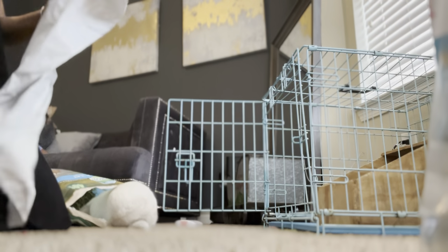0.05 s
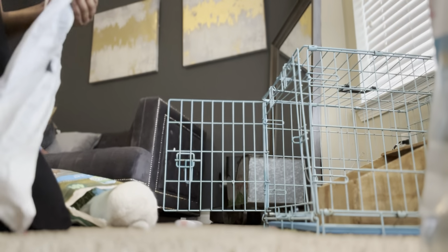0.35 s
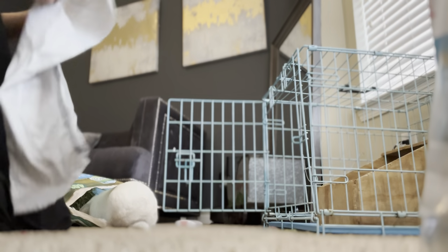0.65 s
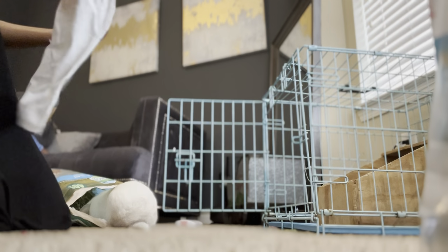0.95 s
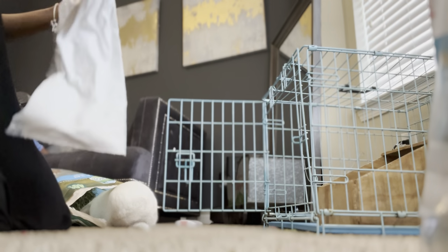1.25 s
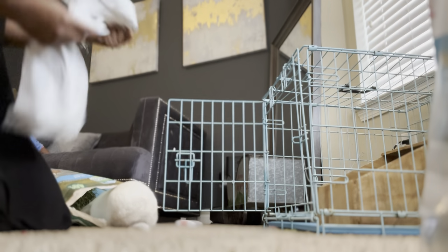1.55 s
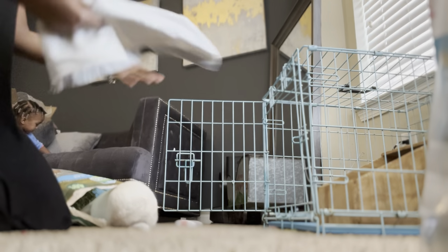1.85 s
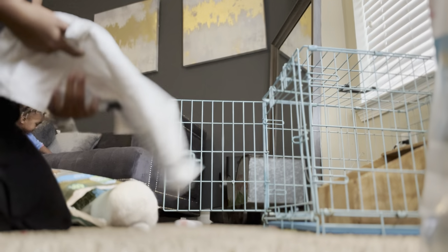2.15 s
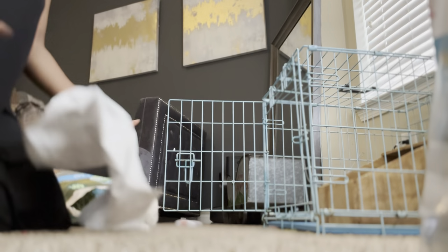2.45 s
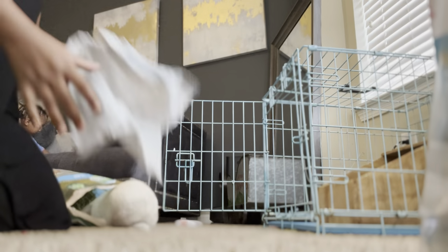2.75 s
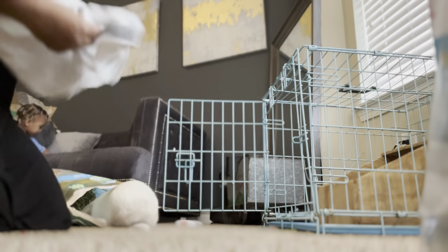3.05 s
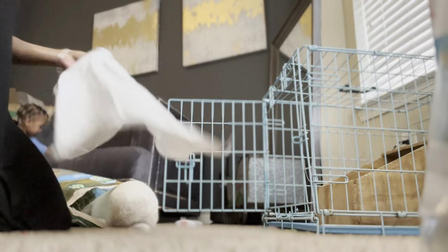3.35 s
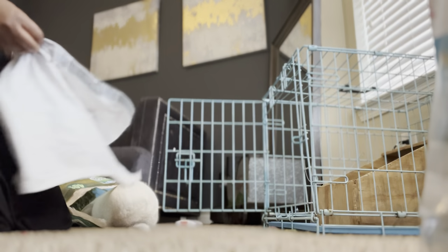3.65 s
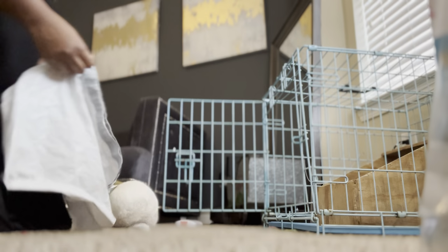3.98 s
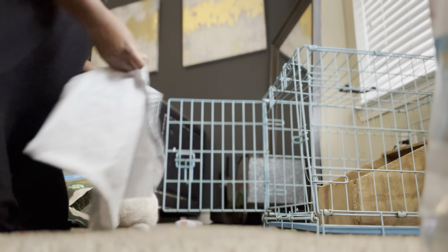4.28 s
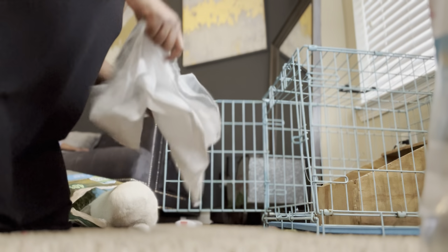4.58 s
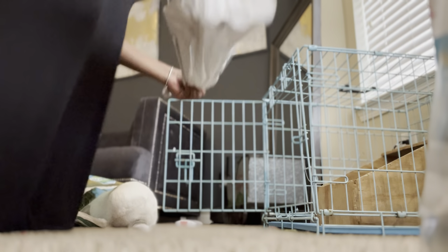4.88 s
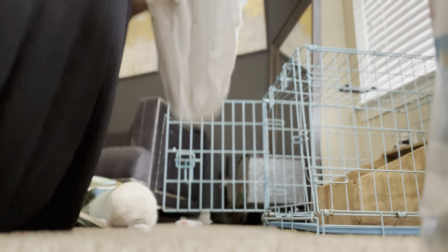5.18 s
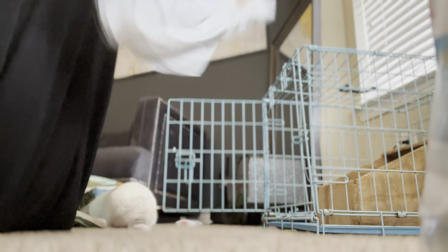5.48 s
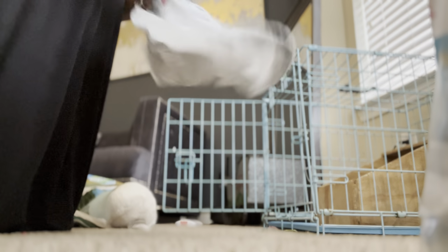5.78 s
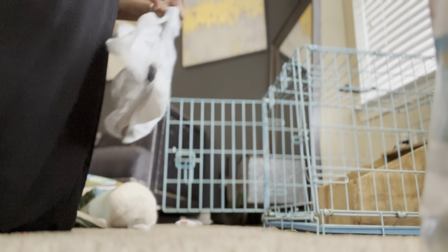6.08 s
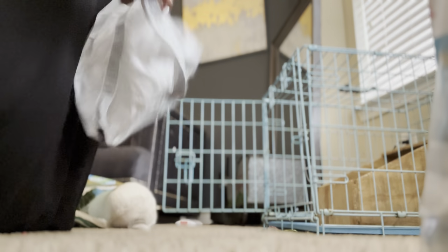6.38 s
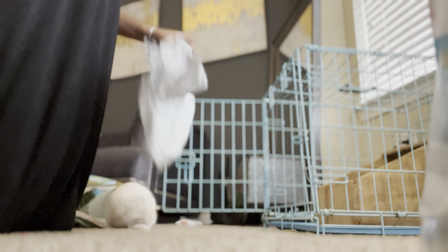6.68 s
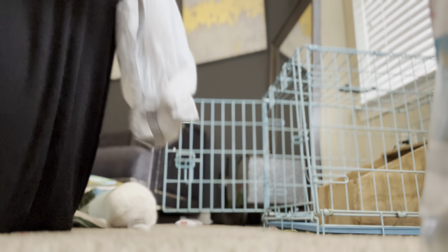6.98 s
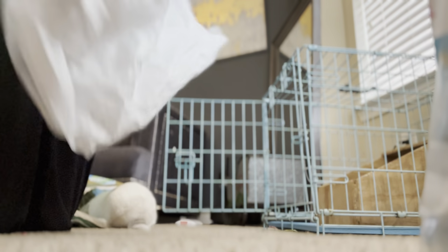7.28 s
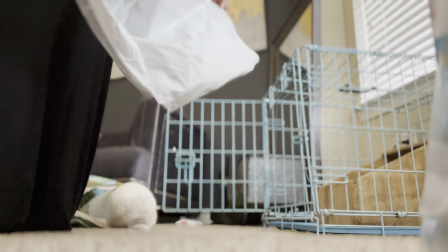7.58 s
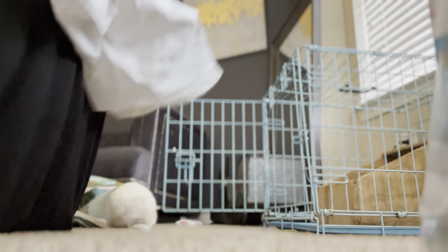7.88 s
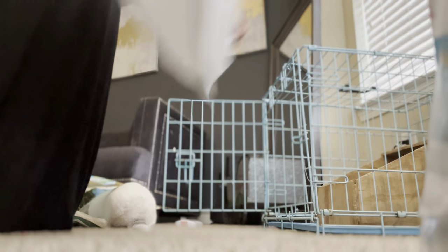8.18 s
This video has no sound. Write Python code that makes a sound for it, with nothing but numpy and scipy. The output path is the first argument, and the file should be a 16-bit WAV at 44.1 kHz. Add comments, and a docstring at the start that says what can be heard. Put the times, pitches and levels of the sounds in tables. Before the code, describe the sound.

In a carpeted living room, heard from the floor, a faint, steady appliance hum runs beneath the close rustling of a thin plastic bag just left of center. Hands scuff the plastic and shake it open with irregular swishes and low puffs of air. One deep, padded thud on the floor stands out after about three and a half seconds, then the bag keeps swishing, its creases snapping more crisply toward the end.

```python
"""An appliance hums and whirrs steadily in a carpeted living room, behind a swishing thin plastic bag.
The bag is swung and shaken a little left of a camera on the floor, heard at its two microphone ports.
Moving film swishes, tiny buckles crinkle, stiff creases snap, and the bag flaps as it fills with air.
Once, after a soft tap, the person's weight lands on the floor with a dull thump.
The hum is a motor's tone beating with the mains; the whirr is its bearing rubbing once a turn."""
import sys
import numpy as np
from scipy import signal
from scipy.fft import rfft, irfft, next_fast_len
from scipy.io import wavfile
from scipy.ndimage import uniform_filter1d, map_coordinates

SR = 44100
rng = np.random.default_rng(int(sys.argv[2]) if len(sys.argv) > 2 else 0)


def wav_record(signal):
    """Record a signal, one row per channel, as 16-bit PCM in the file named by sys.argv[1]."""
    frames = np.transpose(np.atleast_2d(signal))
    bounded = np.clip(frames, -1, 1)
    # unit amplitude maps onto the largest positive 16-bit level
    quanta = np.round(bounded * 32767).astype(np.int16)
    wavfile.write(sys.argv[1], SR, quanta)


N = 371895


def amp(db):
    """Decibels to gain."""
    return 10 ** (np.asarray(db) / 20)


def unit(x):
    """Scale to rms 1."""
    return x / np.sqrt(np.mean(x ** 2) + 1e-20)


def along(points, hz):
    """Read (frequency, value) points on a log frequency axis."""
    freqs, values = np.transpose(points)
    return np.interp(np.log(hz + 1), np.log(freqs + 1), values)


def curve(points):
    """Read (time, value) points at every sample."""
    return np.interp(np.arange(N) / SR, *np.transpose(points))


def wobble(rate):
    """A wandering random curve, rate knots a second."""
    knots = rng.standard_normal(int(N * rate / SR) + 4)
    return map_coordinates(knots, [np.arange(N) * rate / SR], order=1)


def filtered(x, response):
    """Pass x through a complex response of frequency."""
    size = next_fast_len(N + SR // 2)
    return irfft(rfft(x, size) * response(np.fft.rfftfreq(size, 1 / SR)), size)[..., :N]


def equalised(x, spectrum):
    """Shape x by (freq_hz, gain_db) points."""
    return filtered(x, lambda hz: amp(along(spectrum, hz)))


def coloured(x, spectrum):
    """Shape x by a spectrum, at rms 1."""
    return unit(equalised(x, spectrum))


def add(track, s, sound):
    """Mix a sound into a track at time s."""
    part = track[max(round(s * SR), 0):][:len(sound)]
    part += sound[:len(part)]


def pulse(t, hz, cycles):
    """A sine that swells for the given number of cycles, then dies away."""
    age = t * hz / cycles
    return age * np.exp(1 - age) * np.sin(2 * np.pi * hz * t)


def pushes(rows, cycles):
    """One short, soft pressure swing for each row."""
    track, t = np.zeros(N), np.arange(SR // 10) / SR
    for s, db, hz in rows:
        add(track, s, amp(db) * pulse(t, hz, cycles))
    return track


def appliance():
    """Behind the bag, mains hum and a motor's tone beat slowly, over a shaft tone and rushing air."""
    # the motor's drifting tone: time_s, above_mains_hz
    motor_offset = [(0, 1.95), (1.6, 1.57), (2.8, 3.23), (4, 2.3), (4.4, 3.58), (4.8, 1.37), (5.6, 2.87),
                    (6, 2.44), (7.2, 2.33), (8, 1.29), (8.4, 3.28)]
    # its strength: time_s, level_db
    motor_level = [(0, -57), (2.8, -61), (4.6, -49), (8.43, -54)]
    # colour of the moving air: freq_hz, gain_db
    air_colour = [(15, -44), (30, -44), (50, 0), (70, 0), (105, -3.5), (135, -3.5), (170, -13.5),
                  (260, -19), (400, -22.5), (600, -35), (800, -32), (1000, -35.5), (1300, -31.5),
                  (2000, -38.5), (2800, -41.5), (3900, -39), (4700, -37), (5600, -46), (7500, -47),
                  (12000, -67)]
    # how alike the air sounds at the two ports: freq_hz, correlation
    air_likeness = [(60, 0.7), (130, -0.11), (250, -0.75), (480, -0.76), (800, -0.43), (1400, 0.028),
                    (4000, -0.072), (12000, 0.59)]
    mains_hz, shaft_hz = 120.03, 41
    t = np.arange(N) / SR
    mains_phase = 2 * np.pi * mains_hz * t
    motor_phase = mains_phase + 2 * np.pi * np.cumsum(curve(motor_offset)) / SR
    motor = amp(curve(motor_level) + 1.3 * wobble(3.4)) * np.sin(motor_phase)
    hum = amp(-45.5) * np.sin(mains_phase) + motor
    shaft = amp(-57 + 1.6 * wobble(1.9)) * np.sin(2 * np.pi * shaft_hz * t)
    width = lambda hz: np.arccos(np.clip(along(air_likeness, hz), -1, 1)) / 2
    noise = rng.standard_normal((2, N))
    mid, side = filtered(noise, lambda hz: np.array([np.cos(width(hz)), np.sin(width(hz))]))
    air = amp(-49) * coloured(np.array([mid + side, mid - side]), air_colour)
    return np.sqrt(2) * (hum * amp([[.2], [-.2]]) + shaft) + air


def bearing_whirr():
    """The motor's bearing chugs softly: a band of friction noise that swells once a turn."""
    # colour of the friction: freq_hz, gain_db
    rub_colour = [(200, -70), (500, -30), (800, -7), (980, -10), (1200, 0), (1500, -2), (1900, -5.5),
                  (2300, -17), (4000, -40), (8000, -90)]
    turn_hz, first_rub_s, swing_db = 30, .015, 16.5
    angle = 2 * np.pi * turn_hz * (np.arange(N) / SR - first_rub_s)
    rub = amp(swing_db / 2 * np.cos(angle))
    friction = rng.standard_normal((2, N)) + .59 * rng.standard_normal(N)  # partly common to both ports
    return amp(-69.5) * unit(rub * coloured(friction, rub_colour))


def stroke_gains():
    """Each swing gathers speed, holds and dies away; gains of the swish, crinkle and billow."""
    # swings of the bag, rising and falling by 20 dB in rise_s and fall_s:
    # full_speed_s, hold_s, rise_s, fall_s, swish_db, crinkle_offset_db, billow_offset_db
    strokes = [(.092, 0.013, 0.1, 0.05, -68, 3, -2), (.2, 0.056, 0, 0, -74, 1.5, 0),
               (0.57, 0.05, 0.1, 0.3, -62.5, -2.5, -4.5), (0.857, 0.053, 0.23, 0.08, -47, -2.5, -3.5),
               (0.983, 0.15, 0.16, 0.25, -64, 2, -1), (1.18, .035, .05, 0.3, -62, -5, -2),
               (1.396, 0.24, 0.06, 0.21, -54.5, -3, -2), (2.291, 0.068, 0.16, 0.17, -49.5, -6, -1),
               (2.658, 0.05, 0.3, 0.25, -66, 1, -3), (2.9, 0.01, 0.11, 0.27, -55, -1, -4.5),
               (3.136, 0.019, 0.19, 0.0551, -46, -5.5, -6), (3.471, 0.023, 0.04, 0.09, -57, 0.5, 2.5),
               (3.566, 0.053, 0.18, 0.07, -63, 6.5, 0), (3.767, 0.07, 0.35, 0.15, -72, 6, -9),
               (3.98, .04, 0.2, 0.9, -68, 4, -6), (4.288, 0.25, 0.36, 0.76, -53.5, -2, -6),
               (4.729, 0.039, 0.23, 0.0742, -41.5, -1, -3.5), (4.803, 0.027, 0.3, 0.72, -60.5, 4, -1.5),
               (5.385, 0.059, 0.13, 0.04, -49, 7.5, 1.5), (5.77, 0.11, 0.36, 0.13, -56, -1.5, -1),
               (6.234, 0.041, 0.1, 0.33, -55.5, 1.5, -1.5), (6.397, 0.046, 0.12, 0.05, -46, 3.5, -5.5),
               (6.474, 0.023, 0.0954, 0.05, -48.5, 3.5, -0.5), (6.813, 0.013, 0.09, 0.21, -54, 1.5, -2),
               (7.03, 0.083, 0.14, 0.06, -50.5, 0, -1), (7.216, 0.12, 0.19, 0.16, -54.5, 1, -2),
               (7.663, 0.079, 0.32, 0.17, -60, 4, 0.5), (7.953, 0.035, 0.12, 0.14, -50.5, 2.5, 0),
               (8.116, 0.024, 0.2, 0.17, -61.5, 1.5, 3), (8.421, 0.02, 0.04, 0.1, -53, 4, -8)]
    resting_db = np.array([[-73.5], [-78.5], [-73]])  # between strokes the hanging film still stirs
    t = np.arange(N) / SR
    power = amp(resting_db + wobble(7.1)) ** 2
    for s, hold, rise, fall, db, *offsets_db in strokes:
        shape_db = -20 * (np.maximum(s - t, 0) / rise + np.maximum(t - s - hold, 0) / fall)
        near = shape_db > -50
        power[:, near] += amp(db + np.array([0, *offsets_db])[:, None] + shape_db[near]) ** 2
    return np.sqrt(power)


def buckles(per_second, pitch_hz, pitch_spread, size_spread_db, cycles):
    """Countless tiny buckles click on three paths: direct, and scattered to the left and right port."""
    chance, pitch, size = rng.random(N), rng.standard_normal(N), rng.standard_normal(N)
    at = np.flatnonzero(chance < per_second / SR)
    hz = np.clip(pitch_hz * np.exp(pitch_spread * pitch[at]), 600, 15000)
    gain = amp(size_spread_db * np.minimum(size[at], 2.8)) * np.sqrt(hz / per_second[at])
    offsets = np.arange(SR // 600)
    grains = gain[:, None] * pulse(offsets / SR, hz[:, None], cycles)
    detours = rng.integers(0, SR // 1000, (2, N))[:, at]  # scattered clicks come up to 1 ms late
    signs = rng.choice([-1, 1], (2, N))[:, at]
    paths = []
    for arrival, sign in [(at, np.ones(len(at))), *zip(at + detours, signs)]:
        samples = arrival[:, None] + offsets
        paths.append(np.bincount(samples.ravel(), (sign[:, None] * grains).ravel(), N)[:N])
    return unit(np.array(paths))


def shifting_folds(x, depth_db=1.7, width_hz=520, life_s=.06, size=256):
    """Shifting folds lend the film passing resonances, the same on every path."""
    spectra = signal.stft(x, nperseg=size)[2]
    field = rng.standard_normal(spectra.shape[1:])
    field = uniform_filter1d(field, round(width_hz * size / SR), axis=0)
    field = uniform_filter1d(field, round(2 * life_s * SR / size), axis=1)
    return unit(signal.istft(spectra * amp(depth_db * unit(field)), nperseg=size)[1][:, :N])


def bag_film():
    """Faster motion buckles more creases a second, while the film swishes and billows in flutters."""
    # colour of the bright crinkle: freq_hz, gain_db
    crinkle_colour = [(500, -20), (1250, -7.5), (1900, -9.5), (2700, -6.5), (3400, -6), (4300, 0),
                      (5600, -3), (7000, -7.5), (9000, -10), (10500, -16.5), (12000, -18), (15500, -17)]
    # colour of the midrange swish: freq_hz, gain_db
    swish_colour = [(300, -8), (620, -11), (820, 0.5), (1000, -8), (1250, 1.5), (1600, -9), (2200, -14.5),
                    (4000, -17.5), (9000, -29.5)]
    # colour of the low billow: freq_hz, gain_db
    billow_colour = [(120, 7), (210, 3.5), (300, -1.5), (430, 2.5), (550, -2), (720, -12.5), (1200, -32.5)]
    swish_gain, crinkle_gain, billow_gain = stroke_gains()
    per_second = np.clip(3500 * (crinkle_gain / amp(-50)) ** .7, 500, 14000)
    flutter = wobble(70) + .23 * wobble(24)
    hiss = lambda: rng.standard_normal((3, N))
    grains = buckles(per_second, pitch_hz=5200, pitch_spread=.6, size_spread_db=5.6, cycles=.5)
    fine_hiss = amp(1.5) * hiss()  # buckles too fine to tell apart
    crinkle = coloured(shifting_folds(grains + fine_hiss), crinkle_colour)
    swish = coloured(shifting_folds(hiss()), swish_colour)
    billow = coloured(hiss(), billow_colour)
    return (crinkle * crinkle_gain * amp(1.14 * flutter + .82)
            + swish * swish_gain * amp(2.1 * flutter + .67 * wobble(40) - 1.9)
            + billow * billow_gain * amp(2.45 * flutter + 4))


def hand_brushes():
    """A hand meets the film: a sudden papery scuff that dies away."""
    # touches of the hands: start_s, relative_level_db, t60_s
    touches = [(0.087, -53, .08), (0.511, -59, .06), (0.832, -39, .1), (1.686, -49, .06), (2.014, -53, .08),
               (2.223, -51, .1), (2.821, -49.5, .1), (2.904, -44, .09), (3.467, -48, .1), (4.159, -50, .04),
               (5.208, -50, .03), (6.812, -50, .1), (8.123, -53, .05), (8.412, -47, .15)]
    # colour of the scuff: freq_hz, gain_db
    scuff_colour = [(150, -12), (400, -1), (750, -2), (1300, 2), (2100, -11), (4500, -17), (12000, -31)]
    level, t = np.zeros(N), np.arange(SR // 5) / SR
    attack = 1 - np.exp(-t / .002)
    for s, db, t60 in touches:
        add(level, s, amp(db - 60 * t / t60) * attack)
    return amp(2) * level * coloured(rng.standard_normal((3, N)), scuff_colour)


def flaps():
    """The bag fills with air and flaps, each time one low push of pressure."""
    # fillings of the bag: start_s, level_db, pitch_hz
    fillings = [(.097, -46, 283), (.571, -39, 238), (1.208, -40, 260), (1.446, -35.5, 257),
                (1.68, -43, 281), (2.303, -27, 262), (2.316, -27.5, 72), (2.341, -28, 200),
                (2.376, -26, 72), (3.139, -29, 300), (3.143, -27.5, 95), (3.18, -41, 280),
                (3.486, -26.5, 250), (4.721, -30, 204), (4.776, -27, 134), (5.161, -49, 280),
                (6.69, -42, 276), (7.102, -34.5, 380), (7.204, -32.5, 380)]
    return pushes(fillings, cycles=.29)


def snaps():
    """A stiff crease tears through and rings briefly; the film crackles on and the wall answers."""
    # creases that snap through: start_s, relative_level_db, pitch_hz
    creases = [(0.3638, -48, 2860), (0.3645, -46, 4770), (0.375, -51, 5200), (0.6789, -51, 4680),
               (0.9872, -39, 4600), (1.4047, -55, 4750), (1.467, -37, 4200), (1.4738, -42, 3600),
               (1.4824, -48, 3580), (1.6432, -38, 4000), (1.6875, -40, 4020), (2.4133, -45.5, 3420),
               (2.655, -42, 4940), (2.7274, -49, 6550), (2.8217, -43.5, 4750), (2.9053, -37.5, 3540),
               (3.4686, -40, 4800), (3.571, -42, 5500), (3.6, -39, 3500), (3.635, -38.5, 4640),
               (3.6586, -43.5, 5980), (3.81, -47, 4830), (3.8357, -48, 4890), (3.942, -44.5, 4890),
               (3.9896, -41.5, 5000), (4.0642, -44, 4560), (4.0806, -41.5, 5720), (4.097, -48, 4780),
               (4.16, -36.5, 4850), (4.473, -47, 6330), (4.853, -44, 4910), (4.9897, -43.5, 4330),
               (5.209, -44.5, 2580), (5.4454, -27, 5100), (5.88, -46, 3630), (6.4162, -24, 4170),
               (6.4902, -31.5, 4090), (6.5814, -46.5, 3730), (6.9317, -29, 4300), (7.1133, -29.5, 4230),
               (7.1365, -37, 3980), (7.3163, -39.5, 5680), (7.3654, -35.5, 5750), (7.413, -44, 6310),
               (7.6944, -45, 4070), (7.767, -52, 6250), (7.88, -47.5, 3500), (7.947, -32, 5870),
               (7.9793, -32, 4450), (8.1239, -39, 4370), (8.1593, -41, 4440)]
    # colour of the snaps: freq_hz, gain_db
    snap_colour = [(300, -1), (1200, -2), (2500, -1.5), (4700, 3.5), (8000, 3), (11000, -6), (15000, -5)]
    tear_s, crackle_t60_s = .0004, .024
    wall_s, wall_db = .0108, -11
    track, t = np.zeros(N), np.arange(SR // 20) / SR
    tear = amp(-3.5) * t / tear_s * np.exp(1 - t / tear_s)
    crackle = amp(-24 - 60 * t / crackle_t60_s)
    for s, db, hz in creases:
        noise = (tear + crackle) * rng.standard_normal(len(t))
        snap = amp(db - 2) * (pulse(t, hz, cycles=1.25) + noise)
        add(track, s, snap)
        add(track, s + wall_s, amp(wall_db) * snap)
    return equalised(track, snap_colour)


def scrunches():
    """A run of tiny buckles swells and fades, ringing in one fold or, lower, in the bag's hollow."""
    # crumpling folds: centre_s, level_db, length_s, pitch_hz
    crumples = [(0.774, -51, .014, 4500), (.88, -51, 0.1, 1250), (1.39, -55, 0.05, 1250),
                (1.579, -59, .12, 1250), (2.28, -54.5, .12, 1230), (3.079, -58, .1, 1260),
                (0.841, -48, .022, 2420), (0.895, -48.5, .03, 4800), (3.138, -50, .02, 1300),
                (1.476, -54, 0.027, 2900), (2.337, -46.5, 0.027, 4730), (3.478, -47, 0.029, 4770),
                (3.602, -54.5, 0.058, 4500), (4.288, -52, 0.037, 4560), (4.732, -45, 0.074, 2620),
                (4.97, -56, 0.042, 4500), (5.257, -57.5, 0.048, 4600), (5.348, -44, 0.022, 4730),
                (5.383, -37, 0.013, 4860), (5.768, -49.5, 0.027, 4380), (5.793, -49.5, 0.04, 3840),
                (6.427, -40, 0.028, 5100), (6.439, -33, 0.013, 4300), (7.037, -45, 0.023, 5050),
                (7.088, -50, 0.044, 4260)]
    paths, t = np.zeros((3, N)), np.arange(SR // 8) / SR
    for s, db, length, hz in crumples:
        run = rng.standard_normal((3, len(t))) ** 3  # cubing makes the noise spiky
        fold = signal.iirpeak(hz, Q=2.8, fs=SR)
        ring = unit(signal.lfilter(*fold, signal.lfilter(*fold, run)))
        swell = np.sin(np.pi * np.minimum(t / length, 1))
        for path, sound in zip(paths, ring):
            add(path, s - length / 2, amp(db) * swell * sound)
    return paths


def soft_tap():
    """One soft tap beside the bag, a pressure swing of a few cycles."""
    # the tap: start_s, level_db, pitch_hz
    taps = [(3.3395, -39.5, 1370)]
    return pushes(taps, cycles=.76)


def floor_thump(landing_s=3.432):
    """A padded blow sends bending waves through the carpeted floor: the slow low modes arrive last."""
    # modes of the floor: pitch_hz, relative_level_db, t60_s
    modes = [(39.6, -38, 0.54), (61.9, -16, 0.33), (84.4, -12, 0.17), (101.8, -21, 0.36),
             (125.1, -22, 0.46), (148.0, -4, 0.1), (159.4, -8, 0.05), (198.1, -26, 0.26),
             (235.8, -27, 0.11), (271.6, -55, 0.6)]
    t, ring = np.arange(N) / SR, np.zeros(N)
    for hz, db, t60 in modes:
        travel_s = .7475 / np.sqrt(hz)  # wave speed grows with the root of frequency
        age = np.maximum(t - landing_s - travel_s, 0)
        attack = 1 - np.exp(-age * hz / 1.25)
        ring += amp(db - 60 * age / t60) * attack * np.sin(2 * np.pi * hz * age)
    # the wave passes the right port first and is louder there
    phase = lambda hz: np.outer([-1, 1], along([(60, .13), (150, .4)], hz))
    return filtered(ring, lambda hz: amp([[-1.8], [1.8]]) * np.exp(1j * phase(hz)))


def room_tails(gap_s=.0018):
    """Two unrelated echo tails of energy near 1; the room swallows the treble first."""
    # decay of the living room: freq_hz, t60_s
    decay = [(200, .22), (1500, .2), (5000, .14), (13000, .09)]
    hz, t, spectra = signal.stft(rng.standard_normal((2, SR // 4)), SR, nperseg=256)
    fade = amp(-60 * t / along(decay, hz)[:, None])
    tails = signal.istft(spectra * fade, SR, nperseg=256)[1]
    tails *= np.arange(tails.shape[1]) > gap_s * SR
    return tails / np.linalg.norm(tails[0])


def room_echoes(x, size=4096):
    """The moving bag's echoes reach the ports along fresh paths in every short stretch."""
    # the room's answer to the bag: freq_hz, gain_db
    room_colour = [(1500, -9), (6000, -9), (12000, -17)]
    echoes, hop = np.zeros((2, N + SR)), size // 2
    window = np.sin(np.pi * np.arange(size) / size)
    padded = np.pad(x, (hop, size))
    for start in range(0, N + hop, hop):
        stretch = padded[start:start + size] * window
        heard = signal.fftconvolve(stretch[None], room_tails(), axes=1)
        echoes[:, start:start + heard.shape[1]] += heard
    return equalised(echoes[:, hop:hop + N], room_colour)


def microphone_ports(paths):
    """The camera's body gives each port its own phase and level; scattered sound and the room join in."""
    # how alike the ports hear the bag: freq_hz, direct_power_share
    likeness = [(150, .88), (500, .78), (1300, .86), (2200, .6), (4000, .68), (8500, .55), (10500, .9),
                (13000, .97)]
    # phase between the ports: freq_hz, left_lead_rad
    lead = [(150, .4), (290, 2), (520, 3.3), (900, 5.3), (1500, 7.1), (2000, 6.8), (2600, 5.3), (4000, 6.2),
            (5400, 7.6), (7600, 4), (9500, 5.6), (11300, 6), (12700, 9), (15500, 9)]
    # level between the ports: freq_hz, left_minus_right_db
    balance = [(200, 0), (430, 8), (720, 2), (940, 5), (1150, -.5), (1750, 2.5), (2400, 9), (4000, 2.5),
               (5500, 5), (7900, 8), (10300, 0)]
    # where the bag is: time_s, left_lead_ms
    bearing = [(0, 0.049), (1.5, 0.098), (3, 0.1), (4, 0.1), (4.8, 0.0047), (5.5, 0.0022), (6.3, 0.049),
               (8.43, 0.041)]
    share = lambda hz: np.clip(along(likeness, hz), 0, 1)
    phase = lambda hz: np.outer([0, 1], along(lead, hz))
    source = paths[0]
    delayed = map_coordinates(source, [np.arange(N) - curve(bearing) * SR / 1000], order=3)
    # the top treble keeps its place as the bag moves
    right = source + filtered(delayed - source, lambda hz: hz < 9500)
    direct = filtered(np.array([source, right]), lambda hz: np.sqrt(share(hz)) * np.exp(-1j * phase(hz)))
    scattered = filtered(paths[1:], lambda hz: np.sqrt(1 - share(hz)))
    heard = direct + scattered + room_echoes(source)
    return filtered(heard, lambda hz: amp(np.outer([.5, -.5], along(balance, hz))))


def scene():
    """From the living room floor: the bag a little to the left, the thump, and the appliance behind."""
    paths = bag_film() + hand_brushes() + scrunches()  # direct, scattered left, scattered right
    paths[0] += snaps() + flaps() + soft_tap()
    return microphone_ports(paths) + amp(1) * floor_thump() + appliance() + bearing_whirr()


def record(dry):
    """The camera cuts the deepest bass and keeps nothing above its band limit."""
    low_cut_hz, top_hz = 33, 15780
    return filtered(dry, lambda hz: (hz < top_hz) * (1 - np.exp(-(hz / low_cut_hz) ** 6)))


dry = scene()
out = record(dry)
wav_record(out)
```